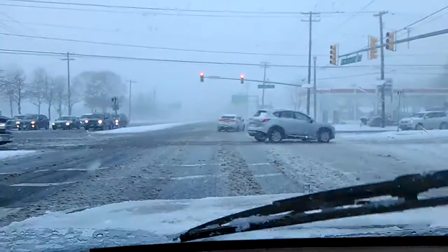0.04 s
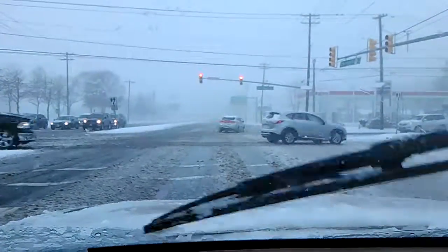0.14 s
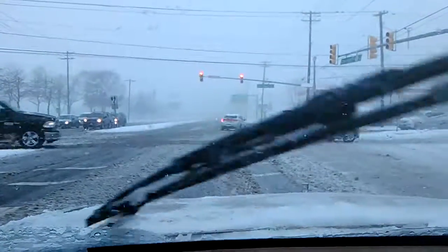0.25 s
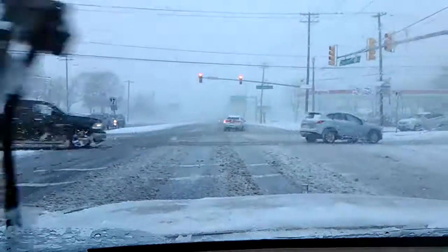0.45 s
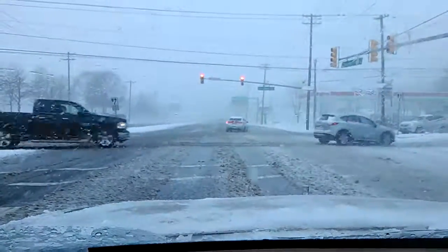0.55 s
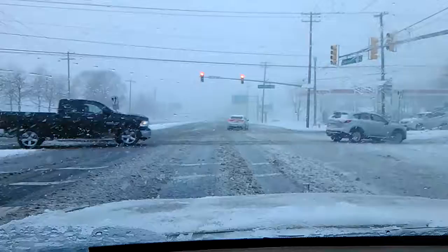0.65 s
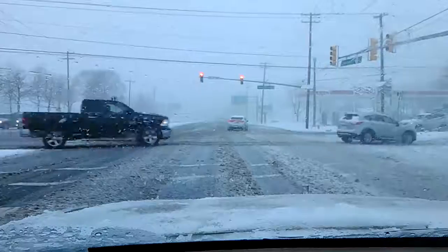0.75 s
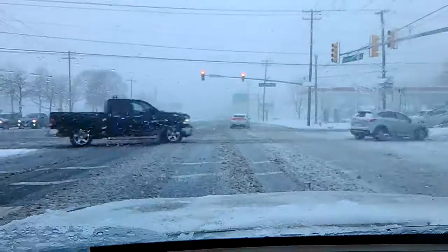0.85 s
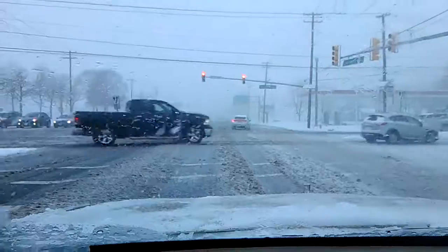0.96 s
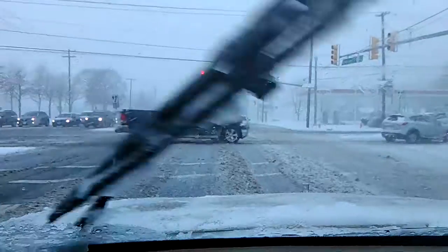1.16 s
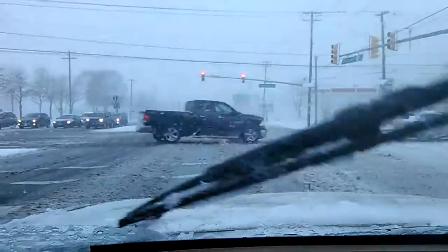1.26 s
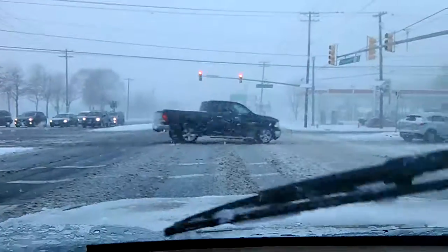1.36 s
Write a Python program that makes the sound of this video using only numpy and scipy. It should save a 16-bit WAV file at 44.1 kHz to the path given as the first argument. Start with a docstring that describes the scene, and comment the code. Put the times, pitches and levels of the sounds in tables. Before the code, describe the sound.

One stuttering rubber wiper stroke with slushy hiss over low engine rumble in a car cabin

```python
"""Inside an idling car, a two-port microphone hears a wiper sweep the snowy glass once, right port first.
The rubber sticks and slips, slowing, then quickening a little before it stops; each slip kicks the windshield
into a groan, pumps the cabin air and gates the hiss of slush under the lip. Behind it the cabin booms softly
with the engine (lumpy filtered noise), with dull thumps (decaying tones) and small rattles (noise puffs).
The cabin adds a short dull tail, and the loud groan flattens in the microphone."""
import sys
import numpy as np
from scipy import signal
from scipy.fft import rfft, irfft, next_fast_len
from scipy.io import wavfile
from scipy.ndimage import map_coordinates

SR = 44100
rng = np.random.default_rng(int(sys.argv[2]) if len(sys.argv) > 2 else 0)


def file_out(sig):
    """Save sig as 16-bit WAV at sys.argv[1]."""
    # one column per channel
    cols = np.atleast_2d(sig).T
    # limit, then scale
    lim = np.clip(cols, -1, 1)
    pcm = np.round(lim * 32767).astype(np.int16)
    wavfile.write(sys.argv[1], SR, pcm)


N = 63945  # samples


def amp(db):
    """dB to gain."""
    return 10 ** (np.asarray(db) / 20)


def unit(x):
    """Scaled to rms 1."""
    return x / np.sqrt(np.mean(x ** 2) + 1e-20)


def along(points, hz):
    """(f/Hz, value) points read on a log frequency axis."""
    f, v = np.transpose(points)
    return np.interp(np.log(hz + 1), np.log(f + 1), v)


def curves(rows):
    """One value per sample for each column after the time."""
    s, *cols = np.transpose(rows)
    return [np.interp(np.arange(N) / SR, s, c) for c in cols]


def wobble(rate):
    """A smooth random curve, rate knots a second."""
    knots = rng.standard_normal(int(N * rate / SR) + 4)
    return map_coordinates(knots, [np.arange(N) * rate / SR])


def filtered(x, response):
    """x times a complex response of frequency."""
    m = next_fast_len(N + SR // 2)
    return irfft(rfft(x, m) * response(np.fft.rfftfreq(m, 1 / SR)), m)[..., :N]


def peak(f, hz, width):
    """One causal resonance."""
    return 1j * f * width / (hz * hz - f * f + 1j * f * width)


def pair(alike):
    """White noise for two ports, mixed from mid and side to be as alike as the table says."""
    def mid_and_side(hz):
        turn = np.arccos(np.clip(along(alike, hz), -1, 1)) / 2
        return np.array([np.cos(turn), np.sin(turn)])

    mid, side = filtered(rng.standard_normal((2, N)), mid_and_side)
    return np.array([mid + side, mid - side])


# Spectrum of the cabin noise: f/Hz, relative level per Hz/dB
IDLE_SPECTRUM = [(13, -73), (22, -53), (69, -3.5), (122, -6), (169, -3.5), (204, -14.5), (268, -19.5),
                 (351, -12.5), (436, -20), (604, -26.5), (860, -25), (1160, -36), (1330, -45.5),
                 (2770, -49), (14500, -76.5)]
# Overall level of the cabin noise: t/s, level/dB
IDLE_LEVEL = [(0, -30), (.2, -31), (.8, -27), (1.0, -35.5), (1.2, -33.5), (1.45, -33.5)]
# Gain of its treble over the rest: t/s, level/dB
IDLE_TREBLE = [(0, 12.5), (.2, 6.5), (.85, 9.5), (1.0, 7.5), (1.45, 4.5)]
# Likeness of cabin sound at the two ports: f/Hz, correlation (1 = identical)
CABIN_ALIKE = [(60, 1), (200, 0.87), (600, 0.95), (1500, 0.13), (6000, 0.1)]
BASS_LUMPS_DB = 2.5


def idle():
    """Engine noise all round in the cabin: shaped noise whose bass, middle and treble waver apart."""
    (level_db,), (treble_db,) = curves(IDLE_LEVEL), curves(IDLE_TREBLE)
    noise = unit(filtered(pair(CABIN_ALIKE), lambda f: amp(along(IDLE_SPECTRUM, f))))
    bass = filtered(noise, lambda f: 1 / (1 + (f / 250) ** 4))
    treble = filtered(noise, lambda f: 1 / (1 + (1300 / (f + 1)) ** 4))
    middle = noise - bass - treble
    lumpy_bass = bass * amp(BASS_LUMPS_DB * wobble(14.26))
    wavering_middle = middle * amp(3.7 * wobble(25))
    wavering_treble = treble * amp(treble_db + 0.52 * wobble(44))
    return amp(level_db) * (lumpy_bass + wavering_middle + wavering_treble)


CABIN_T60_S, CABIN_DB, CABIN_TOP_HZ = .09, -10, 3000


def cabin(x):
    """Reflections off the cabin walls: a short dull decaying noise tail, different at each port."""
    t = np.arange(SR // 4) / SR
    tail = rng.standard_normal((2, len(t))) * amp(-60 * t / CABIN_T60_S)
    wet = signal.fftconvolve(x, tail / np.linalg.norm(tail[0]), axes=1)[:, :N]
    return filtered(wet, lambda f: (f / (f + 150)) ** 2 / (1 + (f / CABIN_TOP_HZ) ** 2))


# Small rattles: t/s (middle of the puff), level/dB, half-length to 1/e/s, f/Hz
RATTLES = [(.005, -48, 0.0095, 2940), (.008, -35.5, 0.009, 830), (.06, -38.5, 0.0038, 2540),
           (.061, -48, 0.0038, 2860), (.062, -59, 0.0047, 4470), (0.074, -45, .005, 2340),
           (0.106, -57, .006, 2480), (.227, -36, 0.004, 1300), (0.228, -24, 0.0045, 576),
           (0.787, -48.5, .005, 2301), (.813, -39, 0.0062, 2210), (.817, -39.5, 0.014, 1920),
           (0.819, -52.5, 0.024, 5500), (.885, -51.5, 0.0083, 2750), (1.159, -55.5, 0.0077, 2630),
           (1.281, -62, 0.017, 2820), (1.401, -50, 0.017, 2700), (1.401, -59, 0.023, 4600),
           (1.422, -42.5, 0.033, 680), (1.434, -48.5, 0.0088, 2850)]
RATTLE_WIDTH = .28  # resonance width over pitch


def rattles():
    """Short puffs of noise, each resonating around one pitch."""
    t, out = np.arange(N) / SR, np.zeros((2, N))
    for s, db, length, hz in RATTLES:
        puff = np.exp(-((t - s) / length) ** 2)
        noise = unit(filtered(pair(CABIN_ALIKE), lambda f: peak(f, hz, RATTLE_WIDTH * hz) ** 2))
        out += amp(db) * puff * noise
    return out


# Dull thumps in the cabin: t/s, level/dB, f/Hz, t60/s
THUMPS = [(.017, -33.5, 118.4, 0.14), (0.044, -23, 126, 0.25), (.092, -23.5, 111, 0.35),
          (0.11, -23.5, 103.8, 0.079), (0.223, -14, 200, 0.14), (.758, -22, 81.7, 0.15),
          (0.829, -16, 154, 0.13), (0.845, -14.5, 116.3, 0.17), (0.879, -21.5, 113.3, .2),
          (.902, -20, 96, 0.12), (0.929, -23.5, 115.3, 0.2), (1.047, -22, 79.3, .3),
          (1.252, -21.5, 110, .25), (1.33, -24.5, 122.7, 0.28), (1.398, -22.5, 120, 0.58)]
THUMP_RISE_S, THUMP_EDGE_DB = 0.0015, -11.5


def thumps():
    """Soft blows that ring the cabin's low modes, each with a brief edge at three times the pitch."""
    out, t = np.zeros(N + SR), np.arange(SR // 2) / SR
    for s, db, hz, t60 in THUMPS:
        ring = amp(-60 * t / t60) * np.sin(2 * np.pi * hz * t) * (1 - np.exp(-t / THUMP_RISE_S))
        edge = amp(THUMP_EDGE_DB - 60 * t / 0.025) * np.sin(2 * np.pi * 3.0 * hz * t)
        out[round(s * SR):][:len(t)] += amp(db) * (edge - ring)
    return out[:N]


# Likeness of the rubbing and slush at the two ports: f/Hz, correlation (1 = identical)
SWEEP_ALIKE = [(100, 0.9), (300, 1), (700, 0.65), (1500, 0.17), (4000, 0.17), (10000, 0.1)]
# Spectrum of the slush: f/Hz, relative level per Hz/dB
SLUSH_SPECTRUM = [(530, -29.5), (900, -0.5), (999, 4.5), (1250, -3.5), (1430, -4), (1830, -7.5),
                  (5990, -23), (8300, -34.5), (14500, -58)]
# Slush under the lip: t/s, level/dB, how sharply each slip gates the hiss
SLUSH_LEVEL = [(.232, -60, .3), (.242, -47, .3), (.25, -29.5, 0.25), (.3, -24, 0.17), (.45, -24, 0.18),
               (.53, -22.5, 0.4), (.555, -29, 0.41), (.6, -21, 0.51), (.68, -27, 0.6), (.76, -35.5, 0.17),
               (.79, -35.5, 0.59)]
SLUSH_LEAD = 0.5  # where in the slip cycle the hiss peaks (radians)


def slush(cycle):
    """Wet snow hissing under the lip: shaped noise let through in a puff each slip."""
    level_db, sharp = curves(SLUSH_LEVEL)
    hiss = unit(filtered(pair(SWEEP_ALIKE), lambda f: amp(along([(500, -43)] + list(SLUSH_SPECTRUM), f))))
    gate = np.exp(sharp * np.cos(cycle - SLUSH_LEAD)) / np.sqrt(np.i0(2 * sharp))  # keeps the mean power
    return amp(level_db) * gate * amp(0.8 * wobble(60)) * hiss


# Resonances of the rubbed glass: f/Hz, width/Hz, level/dB before one broad resonance
GLASS = [(273, 160, 1.5), (406, 130, 0.5), (601, 61, -2), (811, 91, 0), (1030, 83, -12)]
# Uneven rubbing beside the slips: t/s, level/dB
GRIND = [(.232, -30.5), (.268, -16.5), (.38, -15), (.41, -11.5), (.53, -12.5), (.556, -16), (.606, -15),
         (.74, -36), (.79, -35)]
GRIND_GATE = 0.27  # how sharply each slip gates the rubbing


def grind(cycle):
    """Rubber rubbing between and through the slips: gated noise rings the glass."""
    def glass(f):
        rings = sum((-1) ** k * amp(db) * peak(f, hz, width) for k, (hz, width, db) in enumerate(GLASS))
        return rings * peak(f, 500, 1600)

    gated = np.exp(GRIND_GATE * np.cos(cycle)) * amp(1.2 * wobble(40)) * pair(SWEEP_ALIKE)
    return amp(curves(GRIND)[0]) * unit(filtered(gated, glass))


# The sweep: t/s, slip rate f/Hz, slip level/dB, boom level at the slip rate/dB, boom level at twice it/dB
SWEEP = [(0.23, 188, -47, -27.5, -44), (0.249, 186, -26, -3, -33), (.266, 170, -16, -6, -24.5),
         (.285, 146, -12.5, -9, -15), (0.328, 140, -14, -9, -12.5), (0.367, 137, -11.5, -8.5, -17),
         (.395, 121, -11.5, -14, -6.5), (.43, 128, -17, -5, -26), (0.471, 128, -13, -21.5, -13),
         (0.509, 123, -14, -15.5, -11), (0.547, 116, -15.5, -20.5, -17), (0.587, 101, -8.5, -32, -19),
         (0.629, 95.5, -10, -39, -15.5), (.68, 98, -15, -45.5, -16.5), (0.713, 107, -13.5, -41.5, -22.5),
         (0.746, 116, -20, -28, -33.5), (0.786, 120, -37, -37, -17.5)]
JITTER, SCATTER_DB = .033, 2  # spread of a slip's moment (cycles) and size (dB)
SLIP_HZ, SLIP_WIDTH_HZ = 330, 300  # each slip is one short swing of the glass
SOFT_HZ = 1200  # the rubber lip is soft: a slip carries little above this
BOOM_LEAD, SECOND_LEAD = 1.9, -.3  # phase of the two booms against the slip (radians)
FADE_S = .01  # the blade starts and stops


def slip_clock(rate):
    """Stick-slip timing: one kick a cycle, slightly uneven, and the phase running from slip to slip."""
    turns = np.cumsum(rate) / SR
    draws = rng.standard_normal((int(turns[-1]), 2))
    moments = np.arange(len(draws)) + JITTER * draws[:, 0]
    at = np.interp(moments, turns, np.arange(N)).astype(int)
    kicks = np.bincount(at, amp(SCATTER_DB * draws[:, 1]), N)
    cycle = 2 * np.pi * np.interp(np.arange(N), np.sort(at), np.arange(len(at)))
    return kicks, cycle


def slips(kicks, level_db):
    """The groan: each kick from the soft lip swings the glass."""
    swing = lambda f: peak(f, SLIP_HZ, SLIP_WIDTH_HZ) ** 2 / (1 + 1j * f / SOFT_HZ)
    return -amp(level_db) * unit(filtered(kicks, swing))


def boom(cycle, first_db, second_db):
    """Cabin air pumped by the glass: wavering tones at the slip rate and at twice it."""
    first = amp(first_db + 3 * wobble(50)) * np.sin(cycle + BOOM_LEAD)
    second = amp(second_db + 2.3 * wobble(50)) * np.sin(2 * cycle + SECOND_LEAD)
    return first + second


def wiper():
    """One sweep of the blade: slips, rubbing, boom and slush all follow the same stick-slip cycle."""
    rate, level_db, boom_db, second_db = curves(SWEEP)
    t = np.arange(N) / SR
    on = np.clip(np.minimum(t - SWEEP[0][0], SWEEP[-1][0] - t) / FADE_S, 0, 1)
    kicks, cycle = slip_clock(rate)
    return on * (slips(kicks, level_db) + grind(cycle) + boom(cycle, boom_db, second_db) + slush(cycle))


# Balance of the ports: f/Hz, left over right level/dB
BALANCE_DB = [(60, -1.2), (240, -1.4), (700, -1.8), (1400, -.7), (5000, -1.7), (10000, -6)]
# Extra travel to the left port: f/Hz, lag/ms
LAG_MS = [(100, 0.13), (300, 0.28), (700, 0.3), (1200, 0.405)]


def scene():
    """All sources in the cabin at the two ports; sound reaches the right port first."""
    near = wiper() + thumps() + rattles()
    mix = near + amp(CABIN_DB) * cabin(near) + idle()
    side = np.array([[.5], [-.5]])  # left, right: half the difference each

    def ports(f):
        lag_s = side * along(LAG_MS, f) / 1000
        return amp(side * along(BALANCE_DB, f)) * np.exp(-2j * np.pi * f * lag_s)

    return filtered(mix, ports)


# Treble response of the microphone: f/Hz, level/dB
MIC = [(5500, 0), (7500, -4), (9000, -9), (14000, -10)]
CLIP_TOP, CLIP_HARD = .88, 5  # full-scale ceiling, sharpness of the bend
TOP_HZ = 14850


def record(dry):
    """The two-port microphone: soft clipping, a dull treble, then the band limit."""
    soft = dry / (1 + np.abs(dry / CLIP_TOP) ** CLIP_HARD) ** (1 / CLIP_HARD)
    return filtered(soft, lambda hz: amp(along(MIC, hz)) * (hz < TOP_HZ))


dry = scene()
out = record(dry)
file_out(out)
```